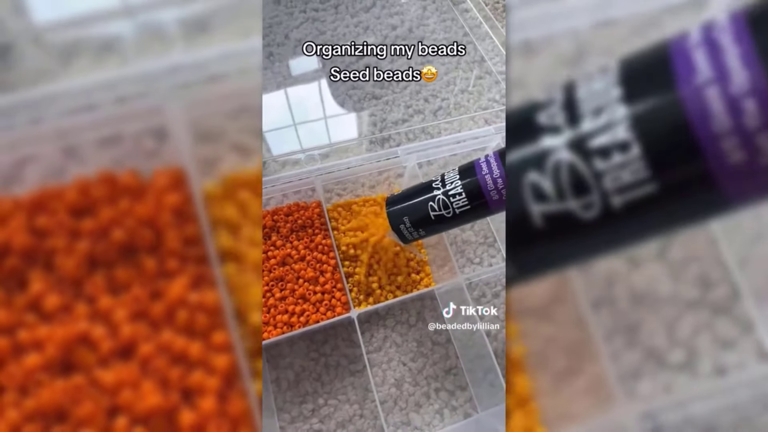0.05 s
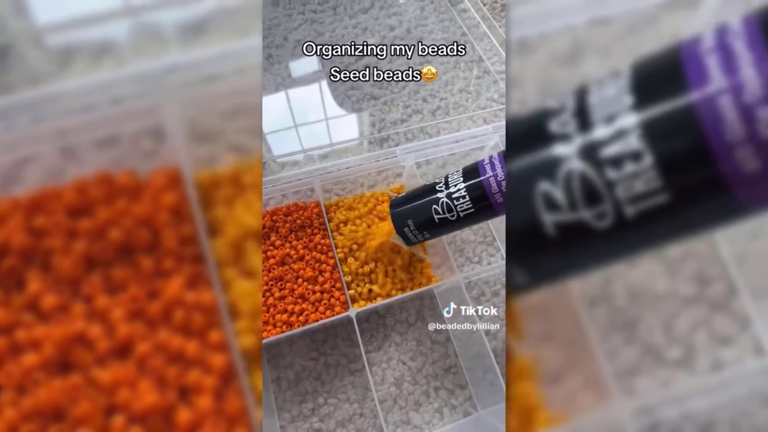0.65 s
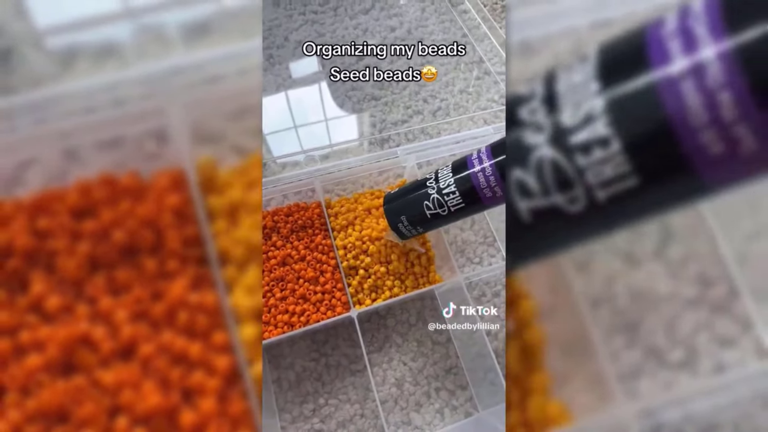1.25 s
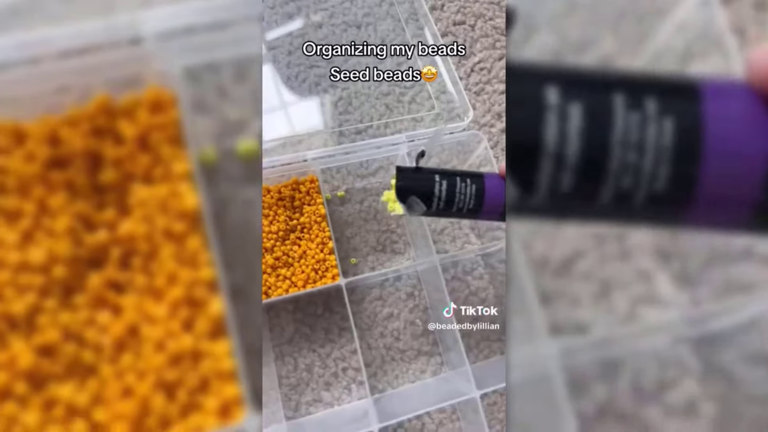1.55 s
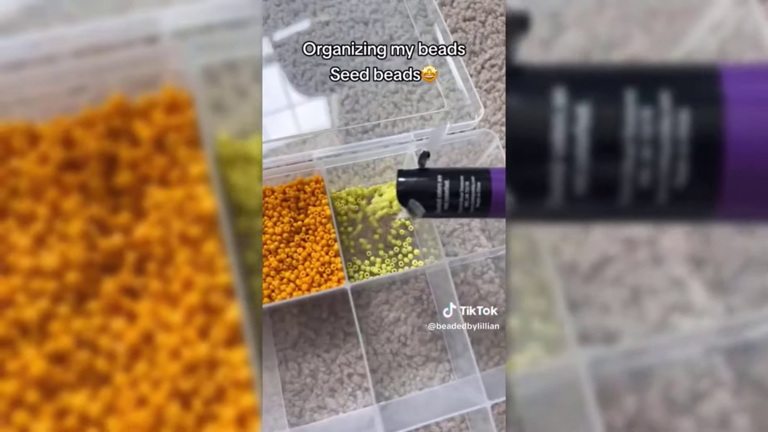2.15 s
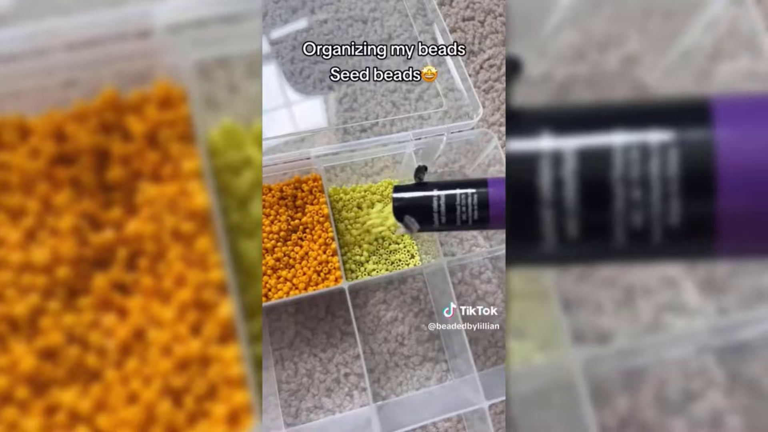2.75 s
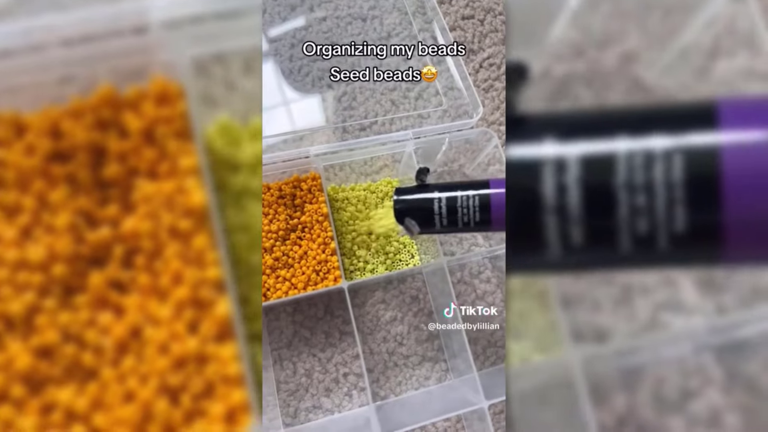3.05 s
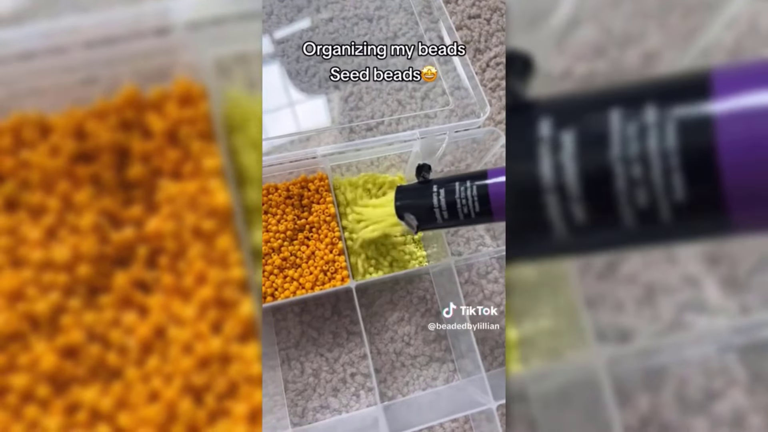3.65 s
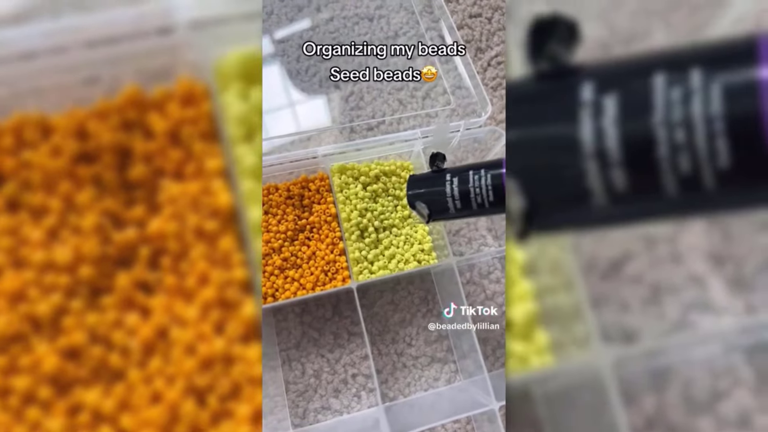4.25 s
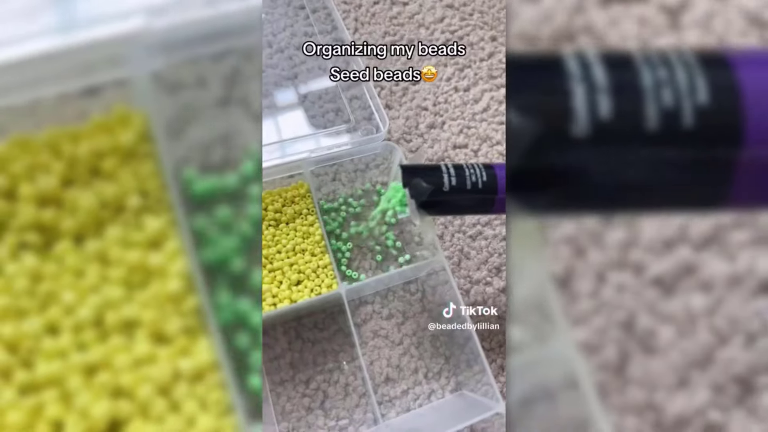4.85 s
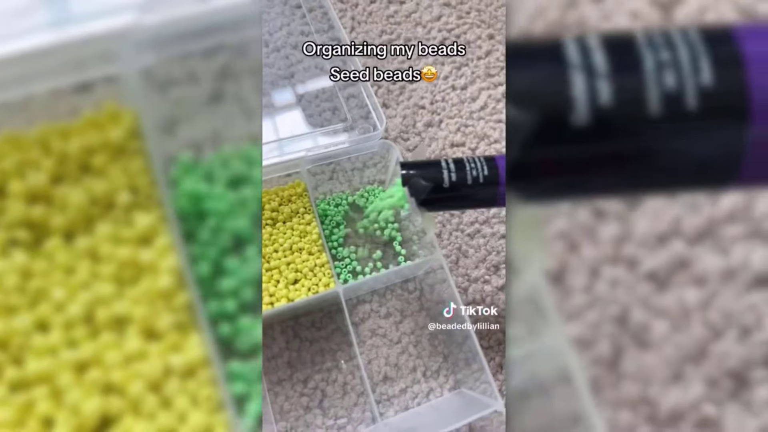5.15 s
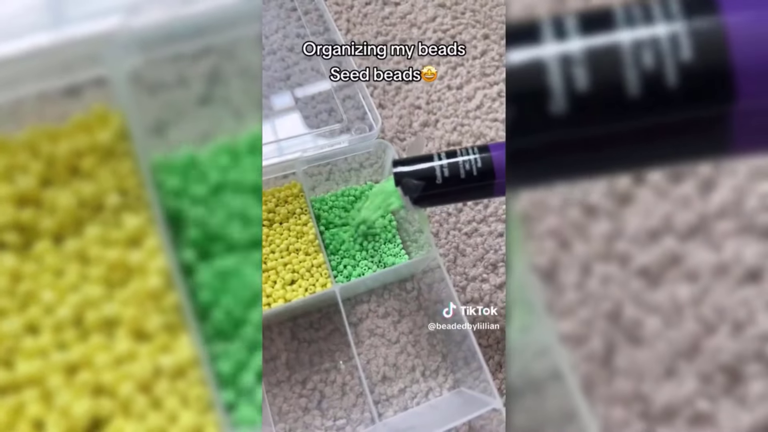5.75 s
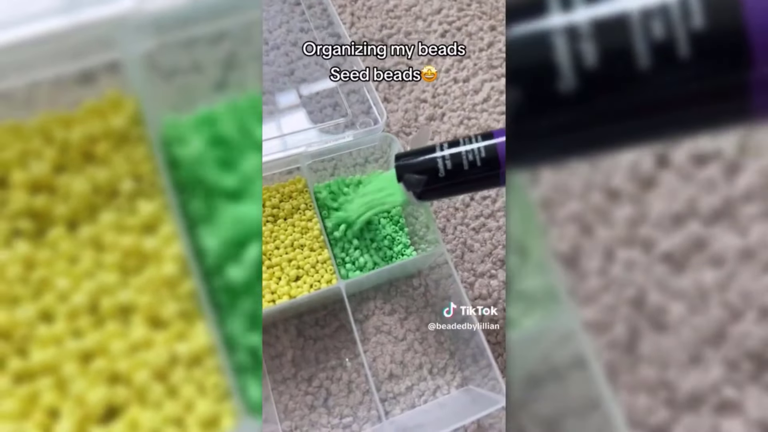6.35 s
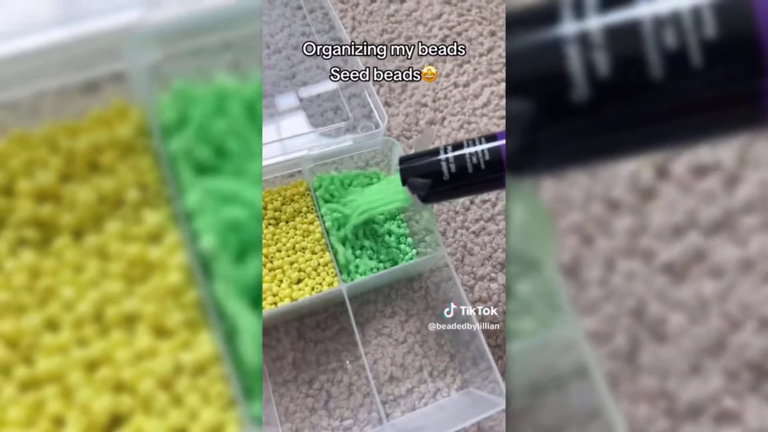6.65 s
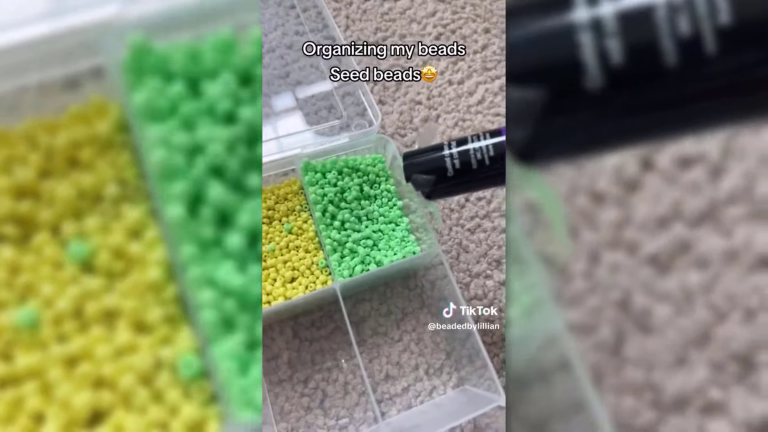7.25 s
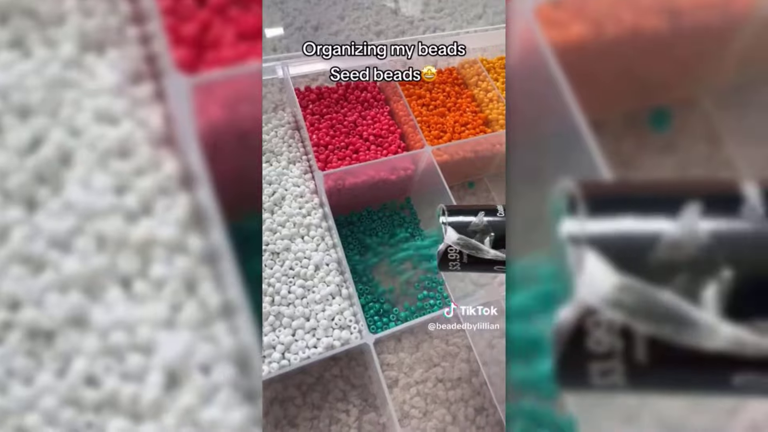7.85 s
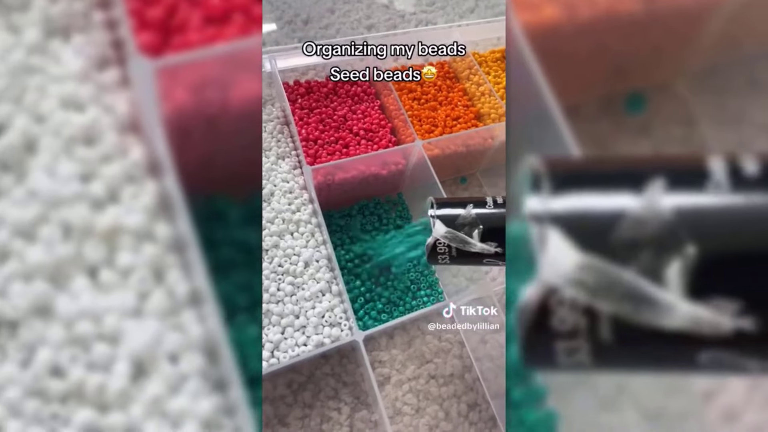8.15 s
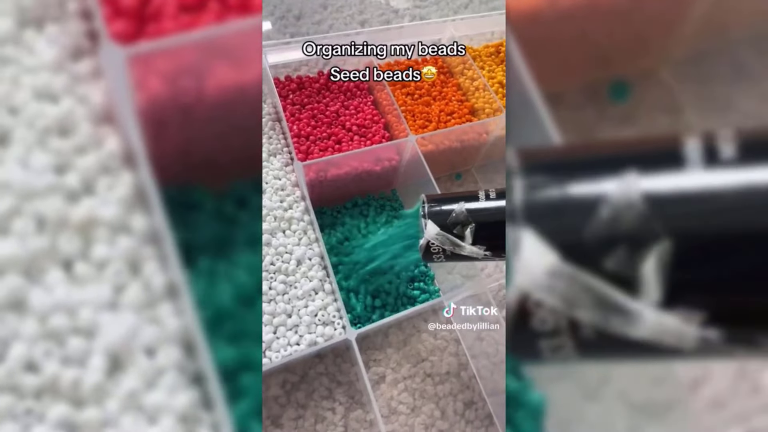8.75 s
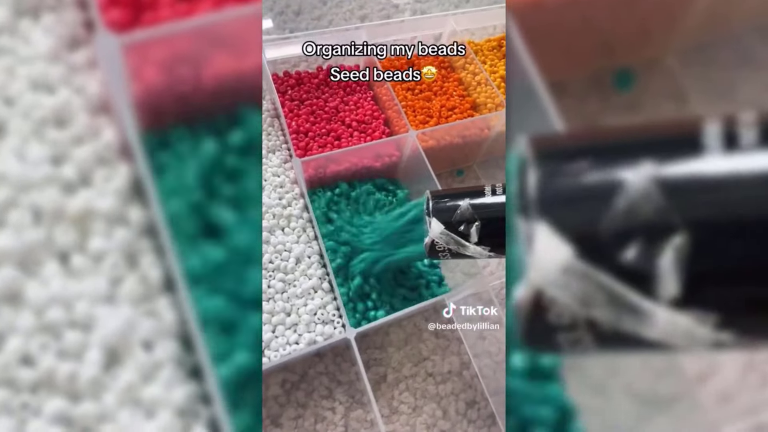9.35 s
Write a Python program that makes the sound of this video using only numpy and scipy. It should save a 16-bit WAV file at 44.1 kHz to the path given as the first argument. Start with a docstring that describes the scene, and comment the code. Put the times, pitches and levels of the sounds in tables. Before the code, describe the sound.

Tiny glass beads pour from a tube into a plastic organizer, close to the microphone, over a faint room rumble. The first pour is already running, a dense fine hiss with a few sharp ticks, and fades at about 1.5 seconds into a brief dropout. At 1.9 seconds a second pour starts with a few clicks and a bright, ringing clatter on bare plastic, smoothing into hiss near 3 seconds and running out around 4.4. After another short gap, hard single bounces begin at 4.8 seconds and thicken into a stream by 5.4, with a high ring from about 5.8 to 6.6 as the heap builds. That pour dies away near 7.4 seconds. At 7.5 a flurry of hard bounces opens the fourth pour, which becomes a full stream at 8 seconds and settles into a softer hiss until the end, around 9.6 seconds.

```python
"""Four pours of tiny glass seed beads, each a bright clatter that melts into a dense hiss.
Four tubes are emptied in turn into compartments of a plastic organizer, close to the microphone.
The first beads bounce singly on the bare floor and make it ring; the growing heap damps the ring.
A faint room rumble lies below, and the sound drops out briefly after the first and second pours."""
import sys
import numpy as np
from scipy import signal
from scipy.fft import rfft, irfft
from scipy.io import wavfile
from scipy.ndimage import uniform_filter1d

SR = 44100
rng = np.random.default_rng(int(sys.argv[2]) if len(sys.argv) > 2 else 0)


def materialize(psi):
    """Save the field psi as 16-bit PCM at rate SR to the path in sys.argv[1].

    A 1-D psi becomes a single channel; in a 2-D psi each row is a channel.
    """
    bounded = np.clip(np.atleast_2d(psi).T, -1, 1)
    quanta = np.round(bounded * 32767).astype(np.int16)
    wavfile.write(sys.argv[1], SR, quanta)


N = 423801
TIME_S = np.arange(N) / SR
FILTER_HZ = np.maximum(np.fft.rfftfreq(4096, 1 / SR), 1)


def pour(span_s, flow, share, bare, heap, bare_db, heap_db, knock_db, heap_per_s, ringing=0):
    """Beads land on plastic or on the heap; bare and heap are the two responses in dB."""
    trickle_per_s, stream_per_s, build_up_s = 400, 1850, .013
    level, opened = flow
    built_up = 1 - (1 - opened) * np.exp(-np.maximum(TIME_S - span_s[0], 0) / build_up_s)
    level = level * built_up * between(*span_s)
    bare_per_s = (trickle_per_s + (stream_per_s - trickle_per_s) * opened) * np.sqrt(share)
    on_plastic = from_db(bare_db) * level * np.sqrt(share) * impacts(bare_per_s, spread_db=3)
    # beads leave the tube in clumps of about 10 ms
    clumps = rms_one(uniform_filter1d(rng.standard_normal(N), size=500))
    on_plastic *= from_db(1.6 * clumps - .3)
    thinning = np.sqrt(level / level.max())  # a weaker stream is also sparser
    on_heap = from_db(heap_db) * level * np.sqrt(1 - share)
    on_heap *= impacts(heap_per_s * thinning, spread_db=4.5)
    knocks = from_db(knock_db) * knock_clicks(span_s)
    clatter = rattle(on_plastic, jostle_db=2, jostle_t60_s=.01, echo_db=-7, echo_t60_s=.04)
    strikes = rattle(knocks, jostle_db=6.5, jostle_t60_s=.013, echo_db=-4, echo_t60_s=.05)
    hiss = rattle(on_heap, jostle_db=-1, jostle_t60_s=.009, echo_db=-5, echo_t60_s=.06)
    duller = bare + slope_db([(4000, .37), (12000, -1.5)])  # heavy strikes carry less treble
    return colour(clatter, bare) + colour(strikes, duller) + colour(hiss, heap) + level * ringing


def orange_pour():
    """First pour: already running, mostly onto the heap."""
    # bead stream (time [s], level [dB])
    flow = [(0.0, -35.5), (0.724, -35), (1.396, -39), (1.52, -43.5)]
    # landing spectra on plastic and on the heap (frequency [Hz], gain [dB])
    bare = [(60, -22), (200, -11), (600, -20), (1100, -12), (2000, 6), (3200, 6.5), (6500, 10.5),
            (9500, 3.5), (16000, 0)]
    heap = [(60, -20), (200, -14.5), (600, -5.5), (1100, -2.5), (2000, -2.5), (3200, 3.5), (6500, 1.5),
            (9500, 5), (16000, -14.5)]
    # compartment modes (frequency [Hz], width [Hz], gain [dB])
    modes = [(382, 120, 7), (946, 290, 5.5), (1381, 450, 8), (2310, 135, -13.5), (2740, 120, 5),
             (4155, 490, -3), (4650, 470, 4.5), (5080, 450, 3), (5560, 140, -6), (6580, 320, -4),
             (8830, 318, -4), (9300, 410, -4.5)]
    return pour((0, 1.532), stream(flow, opens_s=0, trickle_db=1, run_out_db_per_s=100),
                bare_share(covered_s=1.25, fade_s=.12, first=.16, last=.05),
                response_db(bare, modes), response_db(heap, modes),
                bare_db=4.5, heap_db=4, knock_db=5.5, heap_per_s=5500)


def yellow_pour():
    """Second pour: a short trickle, then a stream that covers the floor in about a second."""
    # bead stream (time [s], level [dB])
    flow = [(1.96, -27.5), (2.02, -29), (2.97, -29), (3.61, -35.5), (4.0, -29.5), (4.27, -36.5)]
    # landing spectra on plastic and on the heap (frequency [Hz], gain [dB])
    bare = [(60, -27.5), (200, -20.5), (600, -16.5), (1100, 6), (2000, -2.5), (3200, 2.1), (6500, 1),
            (9500, -0.9), (16000, -4)]
    heap = [(60, -31), (200, -25.5), (600, -20.5), (1100, -2), (2000, -10), (3200, -1), (6500, 5),
            (9500, -2.5), (16000, -8)]
    # modes of the empty and filled compartment and the tube (frequency [Hz], width [Hz], gain [dB])
    empty = [(474, 47, 9.5), (720, 60, -18.5), (1203, 610, 8), (1628, 68, -13.5), (1720, 260, 10.5),
             (2316, 260, 7), (2610, 160, -7), (3760, 240, 11), (3930, 230, -12), (4480, 77, 10.5),
             (4810, 630, -7.5), (5710, 308, 13), (5740, 110, -6), (6400, 510, 5)]
    filled = [(452, 500, 12), (1807, 290, 7.5), (2300, 360, 6.5), (3430, 44, 8.5), (3800, 150, -8.5),
              (4540, 76, -8.5), (5010, 530, -7), (6150, 91, -1), (6500, 210, -4), (7900, 54, -11.5)]
    tube = [(360, 60, -18), (1200, 160, -7), (3500, 160, -3), (7150, 220, -12.5)]
    return pour((1.865, 4.6), stream(flow, opens_s=1.916, trickle_db=-15, run_out_db_per_s=205),
                bare_share(covered_s=2.9, fade_s=.09, first=.78, last=.0097),
                response_db(bare, empty), response_db(heap, filled),
                bare_db=4.5, heap_db=6, knock_db=7.5, heap_per_s=9000,
                ringing=tube_ring(tube, empty_s=4.5))


def green_pour():
    """Third pour: hard single bounces, then a stream whose first layer rings high."""
    # bead stream (time [s], level [dB])
    flow = [(4.87, -27.5), (5.51, -26), (5.58, -24), (6.06, -26.5), (6.59, -31), (7.28, -32)]
    # landing spectra on plastic and on the heap (frequency [Hz], gain [dB])
    bare = [(60, -14), (200, -15.5), (600, -6), (1100, -8.5), (2000, -9.5), (3200, 0.5), (6500, 1.5),
            (9500, -3.5), (16000, -5)]
    heap = [(60, -31), (200, -25.5), (600, -14), (1100, -13), (2000, -5), (3200, 4), (6500, 0.7),
            (9500, -0.4), (16000, -9)]
    # modes of the empty and filled compartment and the tube (frequency [Hz], width [Hz], gain [dB])
    empty = [(346, 270, -12), (1240, 57, -12), (1406, 320, 15.5), (1897, 116, -20), (1958, 250, 16.0),
             (2523, 340, 11.5), (3510, 70, -10), (3600, 100, 8), (4680, 445, 4.5), (5120, 200, -5),
             (6240, 380, 11), (6580, 400, -10.5), (7230, 169, -9), (7440, 64, 4)]
    filled = [(262, 39, 8.5), (784, 640, 7.5), (1263, 230, 5.5), (1830, 100, -8), (2360, 80, 0),
              (2620, 110, 5), (3740, 410, -7), (4700, 230, 2.5), (5140, 83, -4), (6100, 200, 1)]
    tube = [(330, 120, -25), (656, 110, -18), (1311, 200, -7), (3480, 200, -11), (5650, 400, -6)]
    ringing = tube_ring(tube, empty_s=7.4) + thin_layer_ring(from_s=5.77, until_s=6.63, fade_s=.065)
    return pour((4.82, 7.53), stream(flow, opens_s=5.37, trickle_db=-2, run_out_db_per_s=91),
                bare_share(covered_s=6.09, fade_s=.093, first=.92, last=.05),
                response_db(bare, empty), response_db(heap, filled),
                bare_db=5.5, heap_db=6, knock_db=9, heap_per_s=7500, ringing=ringing)


def teal_pour():
    """Fourth pour: a flurry of hard bounces, then a stream that runs to the end."""
    # bead stream (time [s], level [dB])
    flow = [(7.96, -28.5), (8.238, -28), (8.888, -34), (9.524, -35), (9.57, -34)]
    # landing spectra on plastic and on the heap (frequency [Hz], gain [dB])
    bare = [(60, -34), (200, -21.5), (600, -18.5), (1100, 6.5), (2000, 11), (3200, 10), (6500, 3.4),
            (9500, -1.5), (16000, -6.5)]
    heap = [(60, -27), (200, -26), (600, -9), (1100, -7.5), (2000, -11.5), (3200, 4.5), (6500, 6),
            (9500, 0.5), (16000, -8.5)]
    # modes of the empty and filled compartment and the tube (frequency [Hz], width [Hz], gain [dB])
    empty = [(623, 140, 6), (1290, 65, -15), (1840, 81, -12), (1860, 186, -19), (2213, 410, 11),
             (2830, 580, -7.5), (3780, 170, 4.5), (4400, 450, 7), (4600, 240, -8.5), (5004, 180, -17),
             (5320, 140, 5.5), (6340, 175, 13.5), (7720, 310, 9)]
    filled = [(333, 67, -5), (436, 59, -3), (950, 97, 1), (1380, 113, -9), (1890, 120, -4), (2133, 270, 15),
              (2330, 270, 13), (3620, 77, 2.5), (5000, 360, -8), (6400, 72, 4), (6730, 450, -8)]
    tube = [(342, 46, -19), (1120, 140, -13.5), (2220, 200, -5), (3670, 250, -4)]
    return pour((7.53, 9.7), stream(flow, opens_s=7.93, trickle_db=-4.5, run_out_db_per_s=5),
                bare_share(covered_s=8.444, fade_s=.1, first=.94, last=.045),
                response_db(bare, empty), response_db(heap, filled),
                bare_db=5.5, heap_db=5, knock_db=5.5, heap_per_s=6000,
                ringing=tube_ring(tube, empty_s=9.67))


def stream(flow, opens_s, trickle_db, run_out_db_per_s):
    """The flow trickles, opens, follows the tube's tilt and runs out; returns (level, opening 0..1)."""
    times_s, levels_db = np.transpose(flow)
    flow_db = np.interp(TIME_S, times_s, levels_db)
    opened = rise(opens_s, width_s=.015)
    run_out_db = run_out_db_per_s * np.maximum(TIME_S - times_s[-1], 0)
    return from_db(flow_db + trickle_db * (1 - opened) - run_out_db), opened


def bare_share(covered_s, fade_s, first, last):
    """Share of the stream on bare plastic: falls as the heap leaves only the walls exposed."""
    return (first + (last - first) * rise(covered_s, fade_s)).clip(1e-3, 1)


def impacts(per_s, spread_db):
    """Random bead clicks of uneven strength, levelled to unit power over 60 ms."""
    hits = rng.random(N) < per_s / SR
    clicks = hits * from_db(spread_db * rng.standard_normal(N).clip(-2, 2.5)) * rng.choice([-1, 1], N)
    power = np.abs(uniform_filter1d(clicks ** 2, size=2646))
    return clicks / np.sqrt(power + 1e-9)


def knock_clicks(span_s):
    """One click per bead that strikes the plastic hard within the span."""
    # hard strikes (time [s], relative level [dB])
    knocks = [(0.1344, -13), (0.1974, -10.5), (0.4865, -14), (0.5386, -11.5), (0.7392, -12), (0.7527, -12),
              (0.9174, -8), (1.8687, -7.5), (1.8761, -7.5), (1.9086, -7.5), (1.9479, -4), (1.9732, -10),
              (2.0687, -4.5), (2.1318, -7), (2.2653, -13), (2.5084, -7), (4.8246, -14), (4.8424, -9.5),
              (4.8602, -7), (4.877, -7), (4.9066, -11), (4.9444, -9), (4.9558, 1), (5.0016, -6),
              (5.0649, -5), (5.1379, -1.5), (5.1766, -2), (5.282, -4.5), (5.339, -1.5), (5.3896, -1.5),
              (5.437, -2.5), (5.8132, 2.5), (7.2963, -19), (7.422, -17.5), (7.5374, -17), (7.5545, -3.5),
              (7.5605, -3.5), (7.5946, -7.5), (7.6111, -6.5), (7.6316, -7), (7.644, -1.5), (7.67, -4.5),
              (7.6737, -7), (7.7124, -3.5), (7.7404, -2.5), (7.7616, -7.5), (7.8012, -7.5), (7.8132, -8),
              (7.8298, -3), (7.856, -7), (7.8604, -3.5), (7.8968, -2)]
    times_s, levels_db = np.transpose(knocks)
    return np.bincount((times_s * SR).astype(int), from_db(levels_db), N) * between(*span_s)


def rattle(clicks, jostle_db, jostle_t60_s, echo_db, echo_t60_s):
    """A landing bead jostles its neighbours for a few ms; box and room echo it."""
    jostle, echo = from_db(jostle_db), from_db(echo_db)
    sound = clicks + jostle * scatter(clicks, jostle_t60_s) + echo * scatter(clicks, echo_t60_s)
    return sound / np.sqrt(1 + jostle ** 2 + echo ** 2)


def scatter(clicks, t60_s):
    """Each click leaves a decaying noise burst of equal energy."""
    pole = from_db(-120 / (t60_s * SR))
    power = signal.lfilter([1 - pole], [1, -pole], clicks ** 2 + 1e-18)
    return np.sqrt(power) * rng.standard_normal(N)


def tube_ring(modes, empty_s, swell_db_per_s=16):
    """The tube rings louder as it empties."""
    return ring(modes) * from_db(-swell_db_per_s * np.maximum(empty_s - TIME_S, 0))


def thin_layer_ring(from_s, until_s, fade_s):
    """The floor rings high under the first layer of beads until the heap smothers it."""
    # floor modes (frequency [Hz], width [Hz], level re stream [dB])
    modes = [(3600, 90, -9.5), (6100, 160, -3)]
    return ring(modes) * rise(from_s, fade_s) * (1 - rise(until_s, fade_s))


def ring(modes):
    """Bead patter drives narrow resonances."""
    clicks = impacts(per_s=2000, spread_db=5) + 1e-18
    return sum(from_db(db) * rms_one(signal.lfilter(*signal.iirpeak(hz, hz / width_hz, fs=SR), clicks))
               for hz, width_hz, db in modes)


def slide(per_s):
    """Beads tick and slide softly in their tube around the start and end of the second pour."""
    # bead shifts (start [s], level [dB], slope [dB/s], length [s])
    shifts = [(1.754, -49.5, -500, .04), (1.791, -62, 200, 0.093), (4.395, -63, -400, .025),
              (4.423, -58, -200, .08)]
    level = np.zeros(N)
    for start_s, db, db_per_s, length_s in shifts:
        age_s = (TIME_S - start_s).clip(0, length_s)
        level += from_db(db + db_per_s * age_s) * between(start_s, start_s + length_s)
    ticks = level * impacts(per_s, spread_db=0)
    patter = rattle(ticks, jostle_db=2, jostle_t60_s=.009, echo_db=0, echo_t60_s=.06)
    return colour(patter, slope_db([(600, -20), (2000, -8), (6500, 3), (16000, -6)]))


def room(rms_db, whine_hz, whine_width_hz, whine_db):
    """Steady low rumble with a faint whine."""
    # room noise spectrum (frequency [Hz], relative density [dB])
    rumble = [(22, -21.5), (48, -4.5), (80, -8.5), (140, -12), (190, -21), (260, -21.5), (500, -25.5),
              (1200, -29.5), (2100, -35.5), (10900, -49.5), (15000, -53)]
    spectrum_db = response_db(rumble, [(whine_hz, whine_width_hz, whine_db)])
    return from_db(rms_db) * rms_one(colour(rng.standard_normal(N), spectrum_db))


def response_db(broad, modes):
    """Broad spectrum plus one bell per mode; negative bells are cancellations by the walls."""
    bells_db = sum(db / (1 + (2 * (FILTER_HZ - hz) / width_hz) ** 2) for hz, width_hz, db in modes)
    return slope_db(broad) + bells_db


def slope_db(points):
    """Join (frequency [Hz], gain [dB]) points over log frequency."""
    hz, db = np.transpose(points)
    return np.interp(np.log(FILTER_HZ), np.log(hz), db)


def colour(x, gain_db):
    """Minimum-phase filter: peaks ring on after each click."""
    cepstrum = irfft(np.log(from_db(gain_db)))
    half = len(cepstrum) // 2
    cepstrum[1:half] *= 2
    cepstrum[half + 1:] = 0
    impulse = irfft(np.exp(rfft(cepstrum)))
    return signal.oaconvolve(x, impulse)[:N]


def between(start_s, end_s):
    """Gate with 3 ms edges."""
    inside = (TIME_S >= start_s) & (TIME_S < end_s)
    return uniform_filter1d(inside.astype(float), size=130).clip(0, 1)


def rise(at_s, width_s):
    """Smooth step from 0 to 1."""
    return .5 + .5 * np.tanh((TIME_S - at_s) / (2 * width_s))


def from_db(db):
    return 10 ** (np.asarray(db) / 20)


def rms_one(x):
    return x / np.sqrt(np.mean(x ** 2) + 1e-20)


def scene():
    """Four pours in turn over the room rumble."""
    beads = orange_pour() + yellow_pour() + green_pour() + teal_pour() + slide(per_s=1200)
    background = room(rms_db=-58, whine_hz=1750, whine_width_hz=60, whine_db=12.5)
    return (beads + background)[None]


def record(dry):
    """Two brief dropouts, microphone colour and a steep top cut."""
    # dropouts between pours (start [s], end [s])
    dropouts = [(1.538, 1.596), (4.733, 4.819)]
    # microphone treble: a trough, then a bright shelf (frequency [Hz], gain [dB])
    microphone = [(9500, -0.5), (11300, -3), (12900, -2), (13150, 7)]
    leak_db, cutoff_hz = -27, 15950
    gate = 1 - sum(between(*span_s) for span_s in dropouts)
    heard = colour(dry[0] * (gate + from_db(leak_db)), slope_db(microphone))
    lowpass = signal.ellip(12, .1, 80, cutoff_hz, fs=SR, output="sos")
    return signal.sosfilt(lowpass, heard)[None]


dry = scene()
out = record(dry)
materialize(out)
```